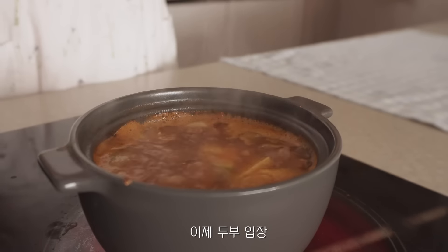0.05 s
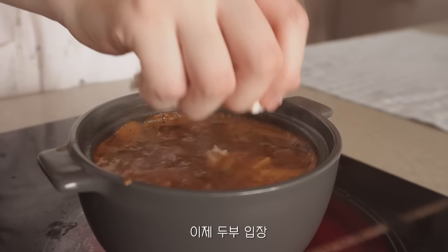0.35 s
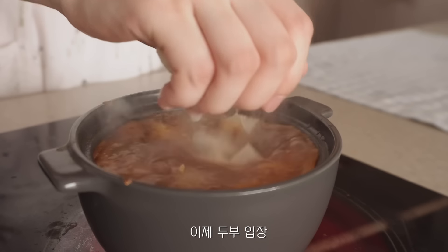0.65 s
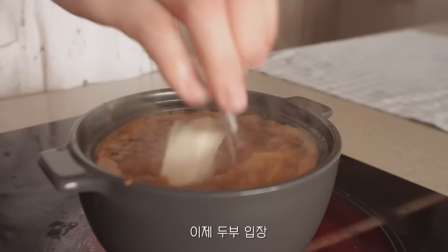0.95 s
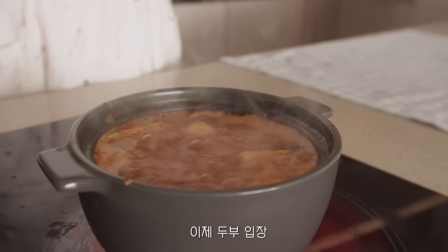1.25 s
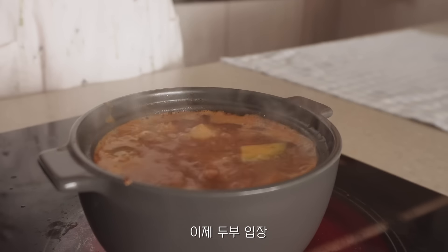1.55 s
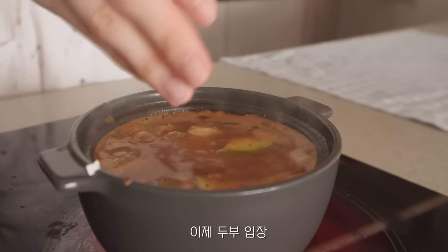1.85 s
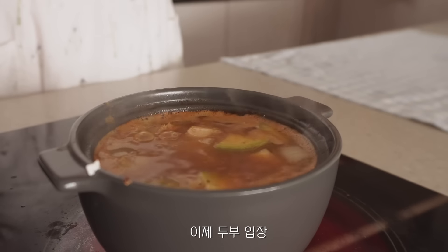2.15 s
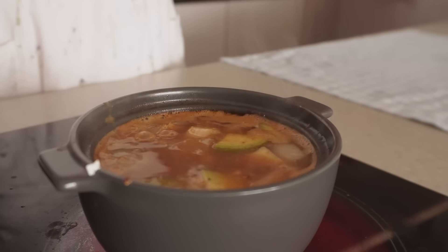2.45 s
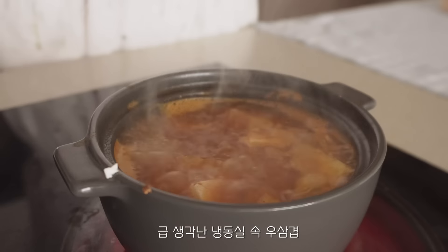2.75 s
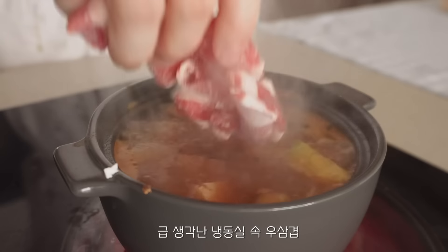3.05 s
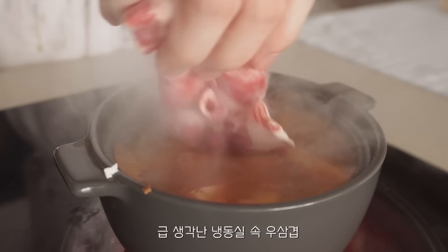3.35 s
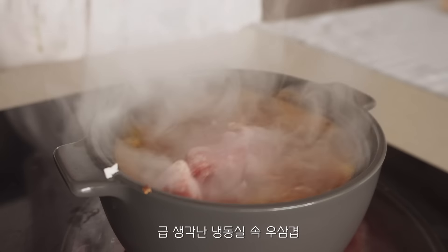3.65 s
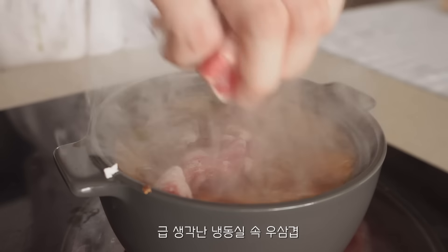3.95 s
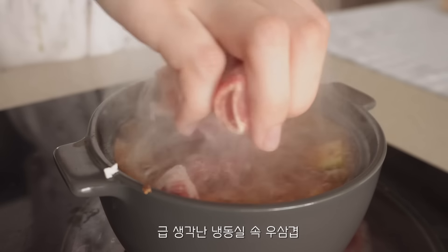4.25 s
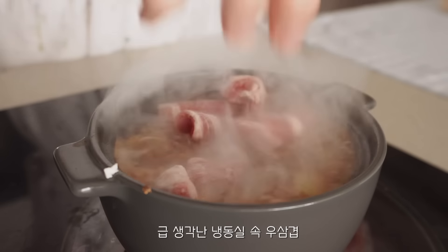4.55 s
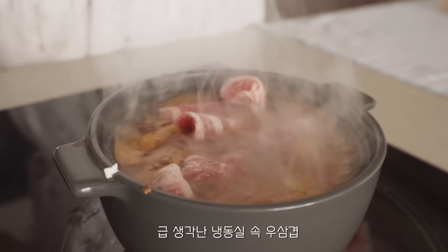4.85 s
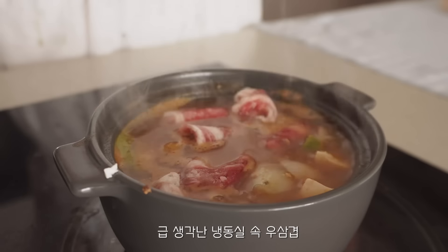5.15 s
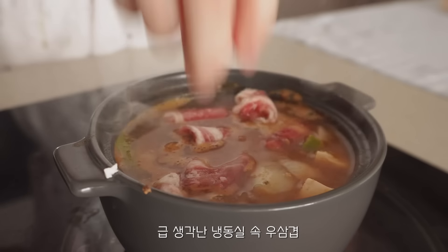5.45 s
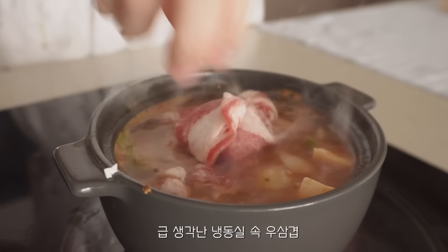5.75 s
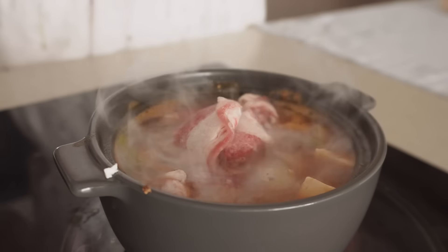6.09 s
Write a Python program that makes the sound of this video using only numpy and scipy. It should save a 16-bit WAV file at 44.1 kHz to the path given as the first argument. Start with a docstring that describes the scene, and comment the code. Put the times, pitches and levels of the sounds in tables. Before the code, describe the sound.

Bright, spitting hisses come and go as broth splashes from a pot onto a hot stovetop, peaking after about a second. The second half is quieter: the stew fizzes and rumbles gently, a dish takes one light knock, and pieces of food drop in with soft plops. Crisp little bubble pops are scattered all along, heard up close in a small kitchen with a short echo.

```python
"""Splashes from a boiling stew hit a hot glass hob and sizzle away in clouds of tiny bursts.
In the ceramic pot, close to the microphone, froth crackles, single bubbles pop and the broth rumbles.
Tofu and slices of meat plop in, and a dish is knocked once and rings.
A small kitchen answers with a short tail over faint room tone."""
import sys
import numpy as np
from scipy import signal
from scipy.fft import rfft, irfft
from scipy.io import wavfile
from scipy.ndimage import uniform_filter1d

SR = 44100
rng = np.random.default_rng(int(sys.argv[2]) if len(sys.argv) > 2 else 0)


def master_out(mix):
    """Clip the mix to full scale and print it as 16-bit PCM to the path in sys.argv[1]."""
    frames = np.transpose(np.atleast_2d(mix))
    ceiling = np.clip(frames, -1, 1)
    pcm = np.round(ceiling * 32767).astype(np.int16)
    wavfile.write(sys.argv[1], SR, pcm)


N = 269892
TIME, HZ = np.arange(N) / SR, np.fft.rfftfreq(N, 1 / SR)

# Splashes on the hob. Each row: start in seconds, level in dB, rise and hold in seconds, fade in dB per
# second, then offsets in dB for the film left behind and for the big, medium and finest bursts.
SPLASHES = [(0.126, -39.5, 0.0086, 0.022, 704, -7.5, 0.5, 0.5, 7),
            (0.371, -47, 0.068, 0.22, 115.5, -14, -4.5, 2, 5),
            (0.71, -45.5, 0.026, 0.038, 195, -5, -7, 0.5, 8),
            (0.99, -46.5, 0.016, 0.0044, 700, -36, -7, -3.5, -15),
            (1.062, -47, .008, .006, 500, -15.5, -34, -6, -4),
            (1.15, -23.5, 0.019, 0.029, 260, -8.5, -5.5, -3.5, 0.5),
            (1.178, -28.5, .07, 0.09, 160, -16, 4, 3, 0),
            (1.666, -49.5, .006, 0.0061, 712, -6.5, -8, -4.5, 7),
            (1.728, -34, 0.0087, 0.014, 596, -11, -12, -1, 4.5),
            (1.89, -53, 0.015, 0.037, 189, -26, -15.5, 2, 8),
            (2.037, -55.5, 0.0052, .008, 300, -5, -20, -1.5, 12.5),
            (2.33, -51.5, 0.068, 0.016, 131, -14, -4.5, 6, 12),
            (2.423, -54, 0.048, 0.08, 124, -18, -6, 5.5, 6),
            (2.67, -50, 0.0032, 0.0077, 202, -20, 1, -2, 15),
            (4.974, -54.5, 0.016, 0.045, 200, -16, -25, -7, 5),
            (5.148, -50.5, 0.009, 0.054, 234, -11, -4, -3.5, 14.5)]
def evaporation(film_fade_db_per_s=73, film_fizz_db=9.5):
    """Each splash spreads, boils and leaves a slowly drying film: an envelope for each size of burst."""
    big, medium, small, finest = np.zeros((4, N))
    t = TIME[:2 * SR]
    for start, db, rise, hold, fade, film_db, big_db, medium_db, finest_db in SPLASHES:
        attack = amp(db) * np.minimum(t / rise, 1)
        drying_s = np.maximum(t - rise - hold, 0)
        drop = attack * amp(-fade * drying_s)
        film = attack * amp(film_db - film_fade_db_per_s * drying_s)
        water = np.maximum(drop, film)
        add(big, start, (water * amp(big_db)) ** 2)  # overlapping splashes add in power
        add(medium, start, (water * amp(medium_db)) ** 2)
        add(small, start, water ** 2)
        add(finest, start, np.maximum(drop * amp(finest_db), film * amp(film_fizz_db)) ** 2)
    return np.sqrt([big, medium, small, finest])


# The bright tone of the sizzle. Each row: frequency in Hz, level in dB.
SIZZLE_EQ = [(100, -37), (300, -23.5), (520, -12), (780, -9.5), (1000, -5), (1450, -1), (1850, -1.5),
             (2400, 1.5), (4000, 1.5), (5700, -1.5), (7400, -9), (8800, -12), (11000, -19), (16000, -26.5)]
def sizzle(sputter_db=2.27, sputter_s=0.013):
    """Water hisses off the glass; the more there is, the more it spits. Returns sound and spit share."""
    envelopes = evaporation()
    water_db = 20 * np.log10(envelopes[2] + 1e-9)
    spitting = np.clip((water_db + 48) / 22, .03, .85)
    spit = np.sqrt(spitting) * bursts(per_s=3600, spread_db=4.4, cap=3.1)
    hiss = np.sqrt(1 - spitting) * bursts(per_s=22000, spread_db=4.5, cap=5.2)
    spurts = amp(sputter_db * np.sqrt(spitting) * flutter(sputter_s))  # hard boiling is uneven
    sound = cloud((spit + hiss) * spurts, envelopes, SIZZLE_EQ, edges_hz=(1350, 3300, 7400))
    return amp(-6.5) * sound, spitting


FROTH_LOUDER_S, FAINT_FROTH_DB = 2.668, -82  # the froth stays faint until here, then is abruptly louder
# The froth's level ride. Each row: time in seconds, crackle level in dB, finest fizz level in dB.
FROTH_LEVELS = [(2.7, -61, -80), (2.89, -61.5, -64.5), (3.0, -64.5, -73.5), (3.21, -66, -77.5),
                (3.76, -69.5, -75.5), (4.14, -69, -82.5), (4.84, -70.5, -86), (4.95, -65.5, -75),
                (5.09, -68, -71.5), (5.16, -64, -78), (5.36, -71, -79.5), (5.65, -75, -82),
                (5.85, -75.5, -90.5), (6.06, -83.5, -106)]
# The tone of the froth. Each row: frequency in Hz, level in dB.
FROTH_EQ = [(100, -23), (400, -2), (750, -1), (1200, 3.5), (1900, -2.5), (3200, 3.5), (5300, -1),
            (7200, -8.5), (9300, -10), (12000, -18), (16000, -25)]
def froth(body_db=-9, mid_db=-0.5, fizz_db=16.5):
    """Tiny bubbles burst on the surface in clusters: a soft wash with short pitched pips on top."""
    wash = amp(-4) * bursts(per_s=9000, spread_db=2.8, cap=4)
    pips = amp(-2.5) * fizz(per_s=750, spread_db=5.5, cycles=9, count=16)
    clusters = amp(1.6 * flutter(0.02041))  # one burst sets off its neighbours
    crackle_db, finest_db = curves(FROTH_LEVELS)
    louder_db = np.array([crackle_db + body_db, crackle_db + mid_db, finest_db + fizz_db])
    envelopes = amp(np.where(TIME < FROTH_LOUDER_S, FAINT_FROTH_DB, louder_db))
    return cloud((wash + pips) * clusters, envelopes, FROTH_EQ, edges_hz=(1450, 7200))


def fizz(per_s, spread_db, cycles, count):
    """Bubbles in `count` sizes, each ringing briefly at its own pitch; even in spectrum, rms 1."""
    out = np.zeros(N)
    for hz in np.geomspace(1500, 15000, count):
        triggers = bursts(per_s / count, spread_db, cap=2.86)
        pips = signal.oaconvolve(triggers, ring(hz, cycles / hz, rise=0.6))[:N]
        out += np.sqrt(hz) * unit(pips)
    return unit(out)


# Featured bubble and droplet pops. Each row: start in seconds, level in dB, pitch in Hz, attack in cycles.
POPS = [(0.0234, -45.5, 4630, 0.29), (0.3107, -49, 4940, 0.71), (0.6258, -36, 8000, 1),
        (0.665, -19, 3780, 0.29), (0.6657, -24.5, 8500, 1.06), (0.9892, -38, 3500, .3),
        (1.0298, -34, 4220, .9), (1.0537, -35, 3460, 0.64), (1.4535, -27, 2600, 0.17),
        (1.5788, -34, 5400, 0.34), (1.7404, -23.5, 2690, 0.28), (1.9225, -29, 6290, 0.14),
        (2.147, -34, 5660, 0.29), (2.2363, -47, 5800, 0.23), (2.2786, -47.5, 6350, 0.29),
        (2.5628, -36, 5570, 0.19), (2.6716, -38, 5470, 0.18), (2.818, -32.5, 4570, 0.28),
        (2.9422, -36.5, 5740, 0.48), (3.1404, -41, 3480, 0.46), (3.3066, -43.5, 2300, 0.36),
        (3.3984, -40, 5300, 0.24), (3.4849, -38, 4550, 0.19), (3.5441, -31.5, 4060, 0.16),
        (3.7161, -39, 7260, 0.46), (3.7535, -47.5, 2670, 2), (3.7639, -36.5, 4050, .25),
        (3.8255, -38, 5200, 0.48), (3.8915, -31, 6100, 0.1), (4.3948, -40.5, 3730, 0.46),
        (4.4659, -40, 4570, 0.33), (4.8767, -36, 3870, 0.22), (4.9913, -29, 4370, 0.15),
        (5.0815, -41.5, 7450, 1), (5.1711, -29, 10000, 0.48), (5.2894, -45, 4700, 0.73),
        (5.4105, -38.5, 4430, 1.3), (5.6581, -32.5, 3460, 0.3), (5.6943, -29, 7300, 0.2),
        (5.7094, -43.5, 3630, 0.76)]
def pops():
    """A film snaps and the little cavity under it rings for a cycle or a few."""
    out, t = np.zeros(N), TIME[:SR // 100]
    for start, db, hz, cycles in list(POPS) + small_pops():
        age = hz * t / cycles
        envelope = amp(db) * age * np.exp(1 - age)
        add(out, start, -envelope * np.cos(2 * np.pi * hz * t + 0.26))
    # so small a source radiates little bass, and the wet film blunts the top
    pop_eq = [(200, -30), (900, -9), (2200, 1), (9000, 2), (12000, -3), (16000, -9)]
    out = colour(out, amp(read(pop_eq, HZ)))
    return out + amp(-7) * echo(out, [(500, 0.014), (10000, 0.02)], delay_s=0.00055)


def small_pops(per_s=3, above_froth_db=14.5, spread_db=6.5, centre_hz=5200):
    """Lesser bubbles of random timing, strength and size that follow the froth: rows as in POPS."""
    froth_db = np.where(TIME < FROTH_LOUDER_S, FAINT_FROTH_DB, curves(FROTH_LEVELS)[0])
    rows = []
    for when, softness, pitch in rng.random((100, 3))[:int(per_s * N / SR)]:
        db = froth_db[int(when * N)] + above_froth_db + spread_db * (1 - 2 * softness)
        rows.append((when * N / SR, db, centre_hz * 2 ** (pitch - .5), 1))
    return rows


# Pieces and big bubbles plopping. Each row: start in seconds, level in dB, pitch in Hz, T60 in seconds.
PLOPS = [(.866, -47.5, 330, 0.024), (2.800, -47.5, 1150, .016), (4.097, -47.5, 1200, 0.014),
         (4.113, -59, 1380, 0.016), (4.252, -46, 203, 0.033), (4.3945, -33.5, 770, 0.0068),
         (4.3948, -33.5, 417, 0.012), (4.397, -42.5, 173, 0.078), (4.502, -55, 870, 0.029),
         (5.643, -42.5, 150.5, 0.063), (5.839, -48.5, 157, .11), (5.839, -53, 750, 0.016),
         (5.84, -53, 1190, 0.017), (5.840, -37, 295, 0.023)]
def plops():
    """Larger pockets of air swell within a cycle, ring, and rise in pitch as they surface."""
    out = np.zeros(N)
    for start, db, hz, t60 in PLOPS:
        tone = ring(hz, t60, rise=0.055)
        attack = 1 - np.exp(-2 * hz * TIME[:len(tone)])
        add(out, start, amp(db) * tone * attack)
    return out


# The modes of the dish. Each row: pitch in Hz, relative level in dB, T60 in seconds.
DISH_MODES = [(627, -11, 0.54), (1490, -1.5, 0.1), (1660, -25, .08), (3100, -5, 0.081), (3900, -17, 0.13),
              (4550, -15, 0.074), (4440, -12, .05)]
def knock(start_s=3.0178, gain_db=-48, clatter_t60=0.082):
    """The knocked dish rings in its modes under a short gritty clatter."""
    out, t = np.zeros(N), TIME[:SR // 4]
    for hz, db, t60 in DISH_MODES:
        add(out, start_s, amp(db) * ring(hz, t60, rise=0))
    grit = noise([(200, -24), (600, 6), (1000, -4.5), (1600, 9.5), (2400, -7.5), (4200, 10.5),
                  (5500, -5.5), (8000, -16), (14000, -47)])[:len(t)]
    add(out, start_s, amp(7) * grit * amp(-60 * t / clatter_t60))
    return amp(gain_db) * out


# The rumble's level ride. Each row: time in seconds, level in dB.
BOIL_LEVELS = [(0.0, -70), (0.92, -68), (1.31, -64), (1.46, -72.5), (2.61, -73.5), (2.71, -63),
               (4.18, -66.5), (4.4, -61.5), (4.54, -65.5), (5.59, -71.5), (5.64, -65.5), (6.1, -63)]
# The dark tone of the rumble. Each row: frequency in Hz, level in dB.
BOIL_EQ = [(35, -27.5), (58, -24), (90, -12.5), (130, -4), (175, 0.5), (230, -4.5), (300, -5), (420, -15),
           (700, -20.5), (1200, -20.5), (2500, -33), (6000, -95)]
def boil():
    """Steam bubbles wobble deep in the broth, each at its own low pitch, over a dull churning."""
    bubbles = np.zeros(N)
    for hz in np.geomspace(135, 650, 16):
        triggers = bursts(per_s=8.8, spread_db=4, cap=1.5)
        glugs = signal.oaconvolve(triggers, ring(hz, 10 / hz, rise=0.13))[:N]
        bubbles += unit(glugs) * amp(read(BOIL_EQ, hz)) * np.sqrt(hz)
    churning = amp(-2) * noise(BOIL_EQ)
    return amp(curves(BOIL_LEVELS)[0]) * (amp(-4) * unit(bubbles) + churning)


# Stereo width of the soft, scattered sounds. Each row: frequency in Hz, side gain in dB.
SOFT_WIDTH = [(60, -20), (110, -24), (200, -16), (380, -17), (700, -16.5), (1290, -17.5), (2380, -14),
              (4400, -8), (8120, -5.5), (15000, -3)]
# Stereo width of the loud spitting: almost mono in the midrange, wide in the top treble.
# Each row: frequency in Hz, side gain in dB.
SPIT_WIDTH = [(60, -20), (110, -22), (200, -16), (380, -20), (700, -38), (1290, -69), (2380, -36),
              (4400, -22), (8120, -5), (15000, -2)]
def widen(soft, spit):
    """Reflections off pot and hob reach left and right differently: the side signal."""
    side = np.zeros(N)
    for send, width in (soft, SOFT_WIDTH), (spit, SPIT_WIDTH):
        reflected = echo(send, [(500, 0.16), (10000, 0.14)], delay_s=0)
        side += colour(reflected, amp(read(width, HZ)))
    return side


# The kitchen's decay. Each row: frequency in Hz, T60 in seconds.
KITCHEN_T60 = [(150, 0.34), (1000, 0.38), (4000, 0.28), (9000, 0.26), (16000, 0.28)]
def kitchen(send):
    """The walls of a small room return a short tail."""
    return echo(send, KITCHEN_T60, delay_s=0.0054)


# The room tone. Each row: frequency in Hz, level in dB.
ROOM_TONE_EQ = [(60, 2), (500, 0), (1000, -2), (2000, -4), (4000, -6), (7000, -13), (10000, -18),
                (16000, -23)]
def room_tone(db):
    """A faint, steady bed of dull noise."""
    return amp(db) * noise(ROOM_TONE_EQ)


def amp(db):
    """Decibels to gain."""
    return 10 ** (np.asarray(db) / 20)


def unit(x):
    """Scales to rms 1."""
    return x / np.sqrt(np.mean(x ** 2) + 1e-20)


def read(points, hz):
    """Reads (Hz, value) points on a log-frequency axis."""
    f, value = np.transpose(points)
    return np.interp(np.log(hz + 1), np.log(f + 1), value)


def curves(rows):
    """Turns timed breakpoints into one automation curve per column."""
    times, *columns = np.transpose(rows)
    return [np.interp(TIME, times, column) for column in columns]


def add(mix, start_s, sound):
    """Lays a sound into the mix."""
    part = mix[max(round(start_s * SR), 0):][:len(sound)]
    part += sound[:len(part)]


def colour(x, gain):
    """Minimum-phase EQ with the given gain per frequency: clicks keep a sharp front."""
    log_gain = np.log(np.maximum(np.r_[gain, gain[-2:0:-1]], 1e-5))
    response = np.exp(signal.hilbert(log_gain).conj()[:len(HZ)])
    return irfft(rfft(x) * response, N)


def noise(eq):
    """Steady noise shaped by (Hz, dB) points, rms 1."""
    return unit(colour(rng.standard_normal(N), amp(read(eq, HZ))))


def flutter(smooth_s):
    """A smoothed random wobble, rms 1."""
    return unit(uniform_filter1d(rng.standard_normal(N), size=int(smooth_s * SR)))


def ring(hz, t60, rise):
    """A dying sine whose pitch climbs by the share `rise` over t60 seconds."""
    t = np.arange(int(1.3 * t60 * SR)) / SR
    return np.sin(2 * np.pi * hz * t * (1 + rise * t / t60 / 2)) * amp(-60 * t / t60)


def bursts(per_s, spread_db, cap):
    """Random clicks, rms 1: many small, a few up to cap * spread_db louder."""
    chance, out = rng.random(N) * SR / per_s, np.zeros(N)
    hit = chance < 1
    out[hit] = amp(spread_db * np.minimum(-np.log(chance[hit] + 1e-12), cap))
    return unit(out * np.sign(rng.random(N) - .5))


def cloud(clicks, envelopes, eq, edges_hz):
    """Shapes clicks into a cloud: each size of burst, big to fine, has its own band and envelope."""
    shape = unit(amp(read(eq, HZ)))
    lowpasses = [1 / (1 + (HZ / hz) ** 6) for hz in edges_hz]
    bands = np.diff(lowpasses, axis=0, prepend=0, append=1)
    layers = [irfft(rfft(clicks * envelope) * band, N) for envelope, band in zip(envelopes, bands)]
    return colour(sum(layers), shape)


def echo(x, t60, delay_s, taps_per_s=4000):
    """Wet signal only: sparse reflections of random sign that die band by band, t60 as (Hz, seconds)."""
    taps = rng.choice([-1., 1.], SR // 2) * (rng.random(SR // 2) < taps_per_s / SR)
    hz, t, spectrum = signal.stft(taps, SR, nperseg=256)
    decay = amp(-60 * t / read(t60, hz)[:, None])
    tail = signal.istft(spectrum * decay, SR, nperseg=256)[1]
    response = np.r_[np.zeros(int(delay_s * SR)), tail / np.linalg.norm(tail)]
    return signal.oaconvolve(x, response)[:N]


def scene():
    """All sources sit in the middle; reflections widen the treble, and the soft sounds most."""
    hob, spitting = sizzle()
    pot = froth() + boil() + plops()
    ticks, dish = pops(), knock()
    reverb = kitchen(amp(-12.5) * hob + amp(-12) * pot + amp(-9.5) * ticks + amp(-5.5) * dish)
    mid = hob + pot + ticks + dish + reverb + room_tone(-77.5)
    soft = amp(0.5) * (1 - spitting) ** 2 * hob + amp(-0.5) * pot + amp(-5) * ticks + amp(-1) * dish
    side = widen(soft, spit=amp(0.2) * spitting * hob) + room_tone(-81)
    return np.array([mid + side, mid - side])


def record(dry, low_cut_hz=42, high_cut_hz=16100):
    """The microphone's low cut and the recorder's band limit."""
    lean = signal.sosfilt(signal.butter(3, low_cut_hz, "high", fs=SR, output="sos"), dry)
    lowpass = signal.firwin(511, high_cut_hz, window=("kaiser", 9), fs=SR)
    return signal.oaconvolve(lean, lowpass[None], "same")


dry = scene()
out = record(dry)
master_out(out)
```